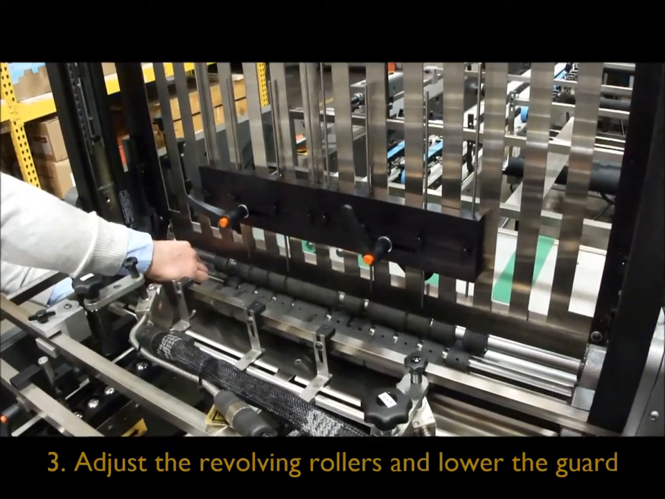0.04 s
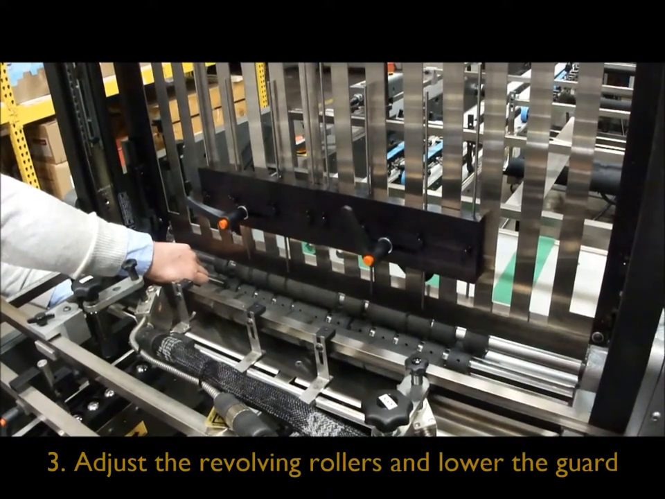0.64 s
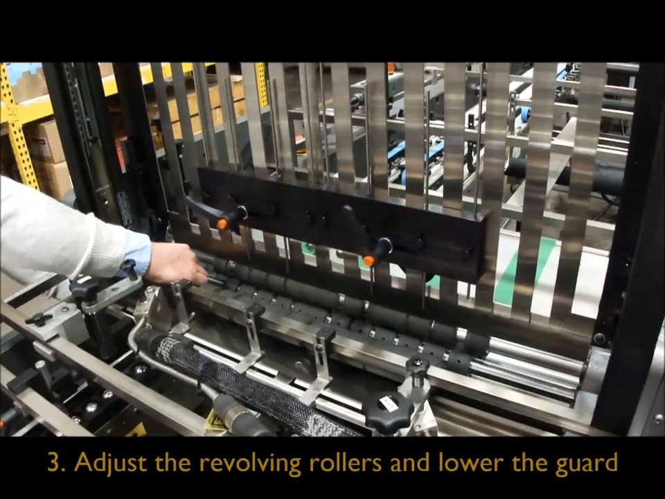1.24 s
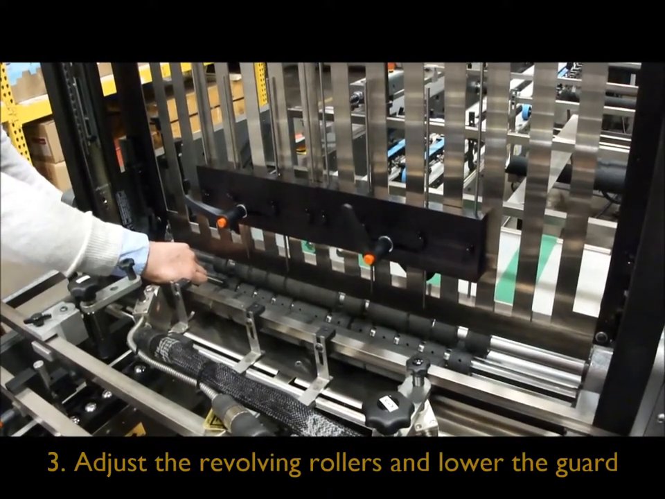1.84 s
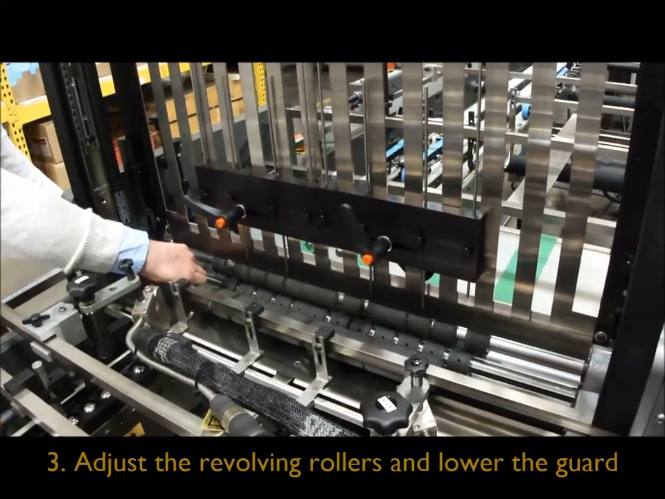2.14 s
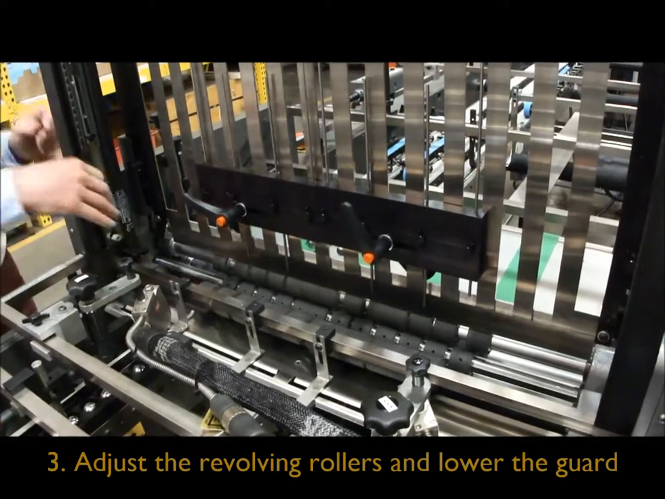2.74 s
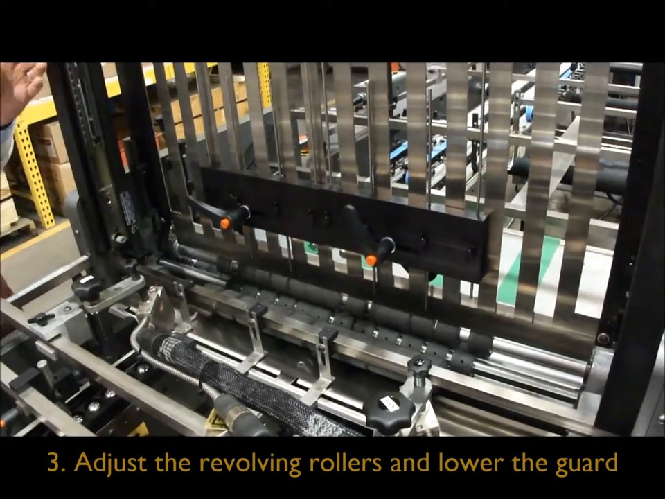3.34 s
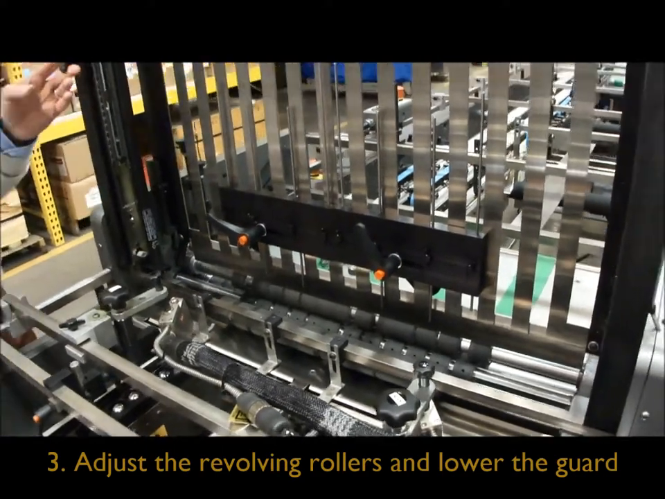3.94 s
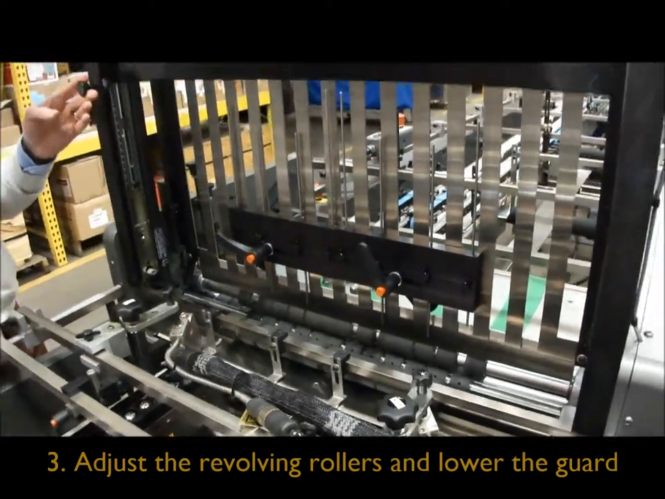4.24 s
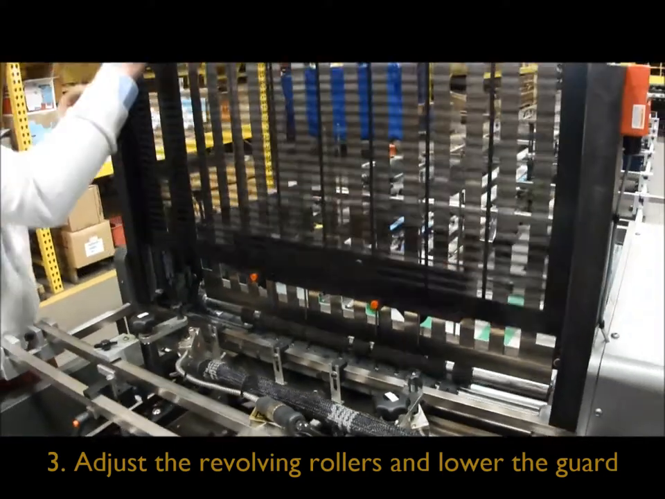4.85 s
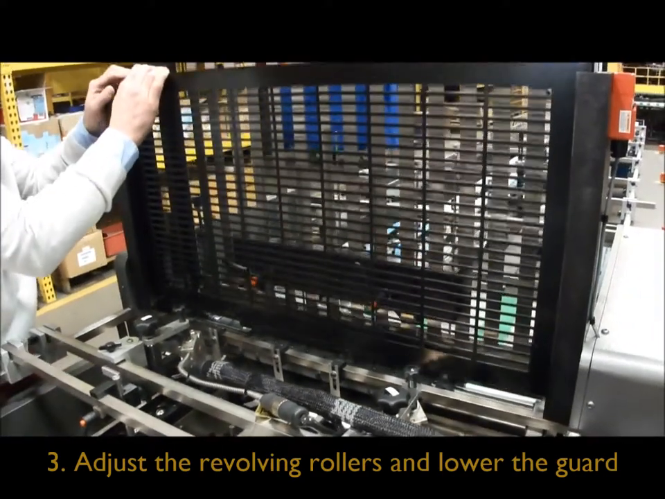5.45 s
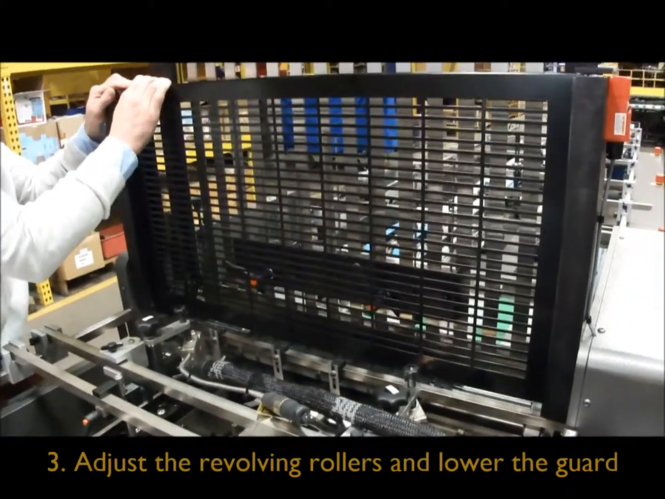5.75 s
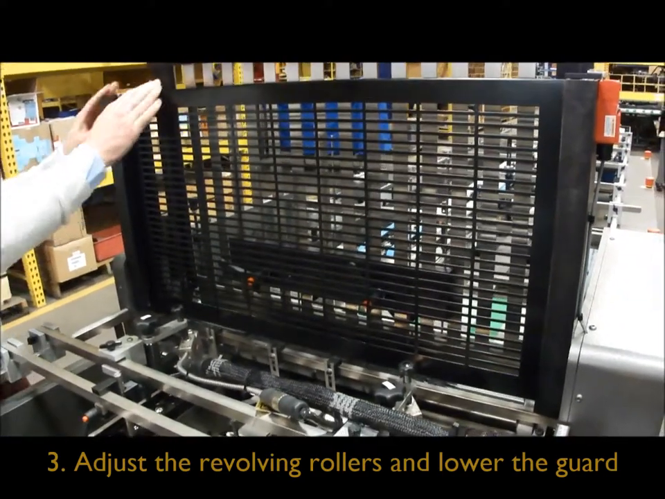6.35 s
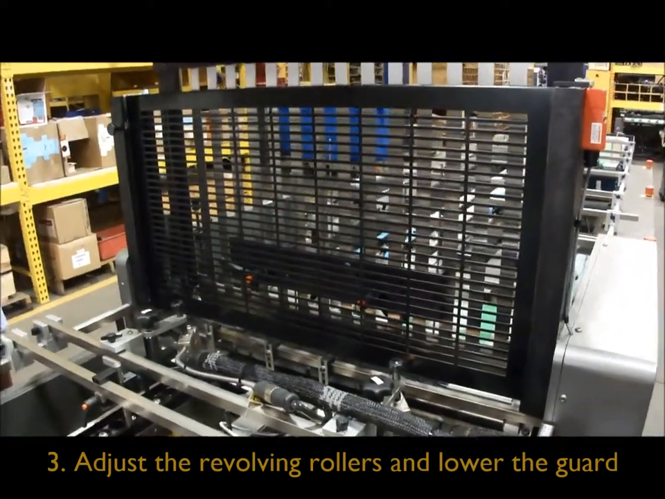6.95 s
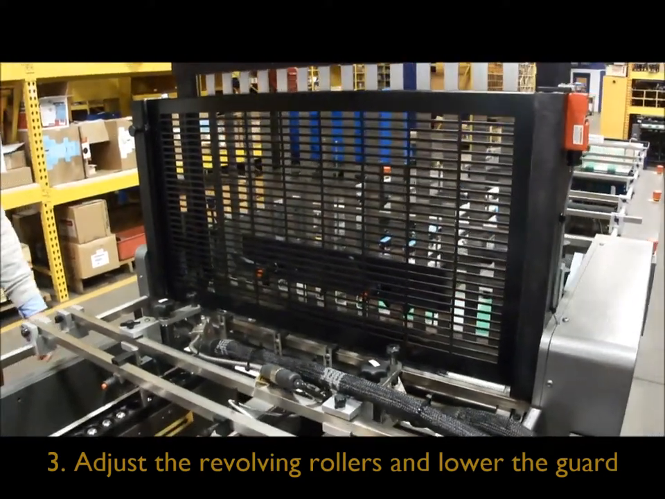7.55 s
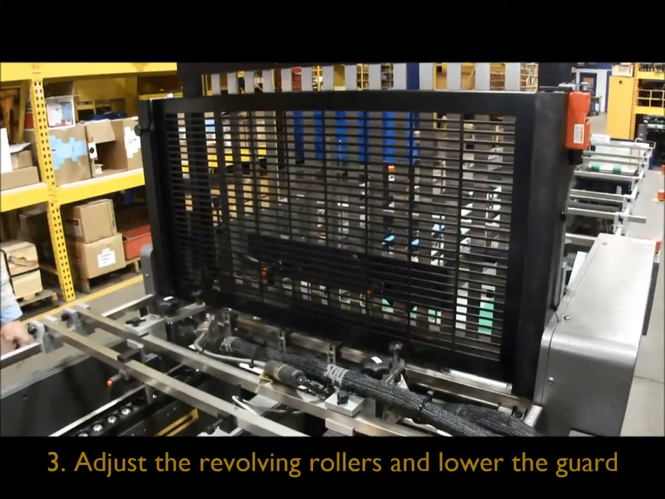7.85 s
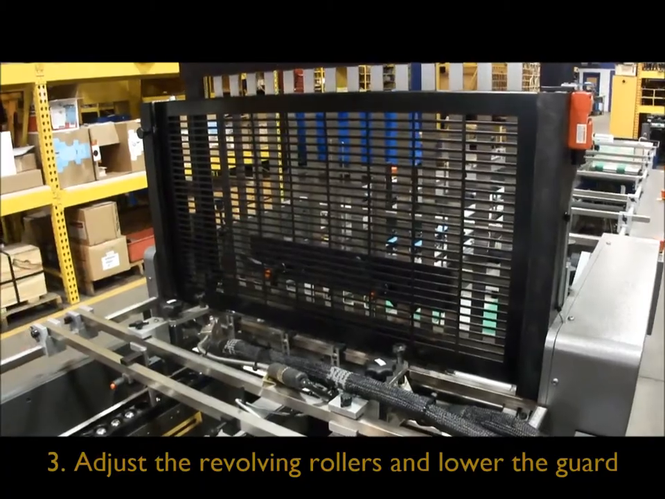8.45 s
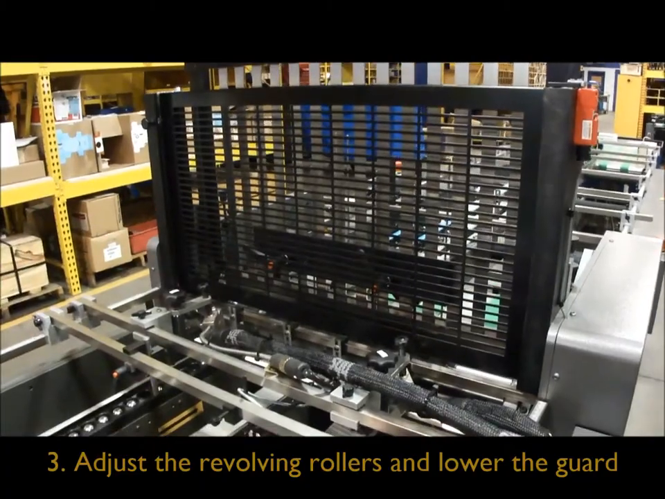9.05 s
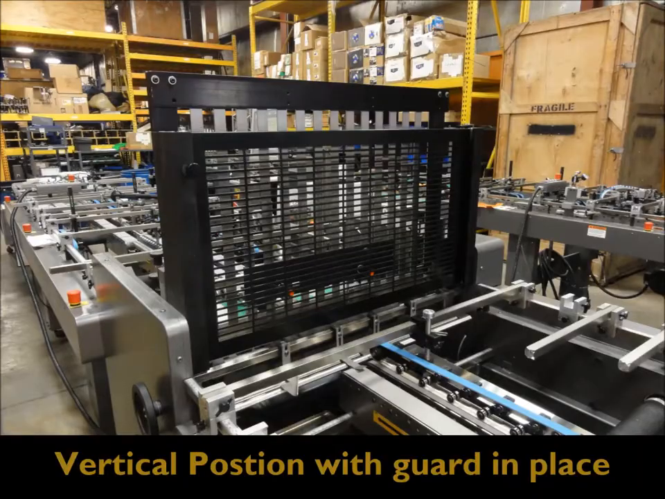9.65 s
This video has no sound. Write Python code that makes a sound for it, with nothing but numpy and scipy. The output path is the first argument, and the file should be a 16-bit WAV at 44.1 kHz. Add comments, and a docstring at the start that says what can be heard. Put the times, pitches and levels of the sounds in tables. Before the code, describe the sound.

Steady fan noise and motor hum from a nearby factory machine run throughout. At first a roller adds a whir and a thin, high whistle, then dies away. Sharp latch clicks follow, and a metal guard slides down with a squeaky scrape, thuds on its stop and clacks into place, ringing briefly in the hall. The machine drones on, with a few light taps close on the right just before an abrupt end.

```python
"""A feed roller whirrs and whistles against its belt, over the fan rush and motor tones of a folder gluer
idling in a factory hall. The roller is set by hand and eased off after about three seconds. A latch
clicks; a steel guard rasps down its rails, knocks on its stop and is snapped home. A few dry taps follow.
Gain control ducks the machine at the loud clicks and lets it swell back. The sound cuts off dead."""
import sys
import numpy as np
from scipy import signal
from scipy.fft import rfft, irfft, next_fast_len
from scipy.io import wavfile
from scipy.ndimage import uniform_filter1d, minimum_filter1d

SR = 44100
rng = np.random.default_rng(int(sys.argv[2]) if len(sys.argv) > 2 else 0)


def to_wav(sig):
    """Store sig (one row per channel, or 1-D mono) as 16-bit WAV at the path in sys.argv[1].

    Samples outside -1..1 are clipped; the rate is SR.
    """
    pcm = np.clip(np.atleast_2d(sig), -1, 1) * 32767
    pcm = np.round(pcm).astype(np.int16)
    wavfile.write(sys.argv[1], SR, pcm.T)  # frames by channels


N = 427329
T = np.arange(N) / SR
FREQ = np.maximum(np.fft.rfftfreq(N, 1 / SR), 1)

# Resonances of the roller and its bracket. Each row: pitch in Hz, width in Hz, relative level in dB.
ROLLER_RESONANCES = [(669, 33, -4), (938, 28, -6.5), (1092, 14, 3), (1089, 18, 3), (1161, 130, 0),
                     (1320, 140, -7.5), (1742, 90, -1), (2230, 550, -15.5)]
# Hits on latch and guard. Each row: start in seconds, peak loudness in dB, clack pitch in Hz,
# clack t60 in seconds, the guard's share in dB, the after-ring's share in dB.
GUARD_HITS = [(3.5627, 3, 8320, 0.02, -30, -24), (3.7388, -13, 6200, 0.083, 1.5, -6),
              (3.769, -14, 7760, .045, -9, -30), (3.791, -16.5, 8500, 0.037, -2, -21),
              (4.676, -17.5, 4600, 0.047, 4, -8), (4.7788, -1.5, 5700, 0.025, 1.5, -20),
              (5.4802, -11.5, 8200, 0.014, -28, -12), (5.516, -7, 7600, 0.022, -16.5, -12.5),
              (5.532, -3.5, 8600, 0.051, -6.5, -17), (5.748, -1, 7100, 0.02, -15.5, -14.5),
              (5.857, -5.5, 7200, 0.051, -21, -13), (5.865, 11.5, 7200, .013, -22, -20),
              (5.8942, -3.5, 6380, 0.097, -5.5, 0)]
# Tone of steel on steel. Each row: frequency in Hz, relative level in dB.
CLACK_COLOUR = [(60, -50), (400, -21.5), (1200, -0.5), (2400, -8.5), (4200, -12.5), (5800, -8), (7400, -1),
                (9500, -2), (11000, -6.5), (13000, -12.5), (16000, -26.5)]
# Ring of the small latch parts. Each row: pitch in Hz, relative level in dB, t60 in seconds.
LATCH_MODES = [(6020, 0, 0.43), (6230, 0.5, .25), (7000, -6, .4), (7540, -3, .3), (6910, 1, 0.3),
               (7930, -10.5, .2), (9000, -10, .4), (9000, -8.5, 0.28), (10000, -11, .3)]
# Ring of the guard frame. Each row: pitch in Hz, relative level in dB, t60 in seconds.
FRAME_MODES = [(605, -8.5, 0.61), (1200, -11, 0.29), (1347, -9.5, 0.35), (1530, -2.5, 0.33),
               (1494, -12.5, 1), (1677, -6, 0.64), (1920, -16, 0.78), (2133, -9, 0.17), (2180, -14.5, 0.68),
               (2280, -16.5, 0.76), (2570, -17, .13), (3321, -11, 0.42)]
# The guard landing and settling. Each row: start in seconds, level in dB, t60 in seconds.
LANDINGS = [(4.785, -9, .65), (4.872, -19, 0.35)]
# Dull boom of a landing. Each row: frequency in Hz, relative level in dB.
LANDING_COLOUR = [(90, -38), (180, 0), (260, 5), (380, 9), (650, -3.5), (1200, 3.5), (2150, 1),
                  (2700, -15.5), (5000, -36), (12000, -47.5)]
# Swell of the guard's slide. Each row: time in seconds, level in dB.
SLIDE_LEVEL = [(4.1, -49), (4.35, -41), (4.7, -29), (4.98, -30), (5.08, -41), (5.35, -59)]
# Rasp of the rails. Each row: frequency in Hz, relative level in dB.
RASP_COLOUR = [(4500, -12), (7500, -10), (8000, -0.5), (8900, 3.5), (10500, -1), (11500, 0), (16000, -12)]
# Small dry taps. Each row: start in seconds, knock level in dB, knock pitch in Hz, tick level in dB.
DRY_TAPS = [(8.3339, 9.5, 1430, 7.5), (8.3355, -1, 1700, -1), (8.692, 3, 1423, -20),
            (8.816, -9, 2000, -4.5), (8.828, -2, 2120, -33)]
# Soft high swishes. Each row: crest time in seconds, length in seconds, level in dB, pitch in Hz.
HIGH_SWISHES = [(3.397, .5, -61, 9000), (4.352, 0.37, -41, 5900), (7.697, 0.22, -38.5, 8350),
                (8.803, 0.35, -35.5, 7600)]
# Gear tones. Each row: pitch in Hz, relative level in dB.
GEAR_TONES = [(925, -4.5), (947.5, 1.5), (990.5, -1), (1087, -4.5)]
# Rise and fall of the gear tones. Each row: time in seconds, level in dB.
GEAR_SWELL = [(0, -39.5), (3.6, -41.5), (4.5, -29), (5.7, -29), (6.8, -40.5), (7.6, -31.5), (8.9, -35)]
# Steady tones of shafts and bearings. Each row: pitch in Hz, rms level in dB.
BEARING_TONES = [(352, -50), (404, -40.5), (412, -38.5), (764, -39), (1028, -49), (1071, -32.5),
                 (1141, -37), (1200, -39.5), (1296, -50.5), (1336, -39), (1362, -35.5), (1523, -46),
                 (1906, -42), (2180, -43.5), (2449, -49), (2724, -46.5)]
# Shaft and mains hum. Each row: pitch in Hz, rms level in dB.
HUM_TONES = [(55.5, -62), (111, -56), (120, -52), (141, -62), (177.6, -44), (229, -44.5), (266, -44),
             (451, -40), (479, -40), (667, -38)]
# Rush of fans and belts. Each row: frequency in Hz, relative level in dB.
RUSH_COLOUR = [(25, -43.5), (75, -26), (115, -11), (200, -7), (390, -0.5), (650, 1), (1050, 1), (1500, 0),
               (2300, -7), (5600, -24.5), (8000, -24), (10000, -27), (11500, -41.5), (16000, -36.5)]
# Tone control with deep cuts in the harsh treble. Each row: frequency in Hz, gain in dB.
EQ_CURVE = [(2450, -0.5), (2750, -11), (3000, -28.5), (3220, -16), (3550, -12.5), (3820, -16.5),
            (4000, -33.5), (4220, -13.5), (4550, -10), (4820, -14), (5000, -22.5), (5200, -10), (5550, 1.5),
            (10800, -7.5), (12300, -42), (13700, -28.5), (15200, -4.5)]


def roller(ease_off_s=2.41, turn_hz=19.7, flutter_db=-0.2, whistle_hz=7310, sag_hz_per_s2=50):
    """Friction rings the roller; its nip hisses, with one steady whistle and one that sinks as it is set."""
    eased = np.maximum(T - ease_off_s, 0) ** 2  # off the belt, each layer fades ever faster
    body = noise(sum(undb(db) * resonance(hz, width) for hz, width, db in ROLLER_RESONANCES))
    # the belt grips unevenly, a little harder once on each turn
    grip = undb(1.316 * walk(15) + flutter_db * np.sin(2 * np.pi * turn_hz * T))
    steady = noise(resonance(5612, 60) + undb(-8.5) * resonance(5610, 380))
    # a narrow band of noise, shifted up to ride the falling pitch
    sinking_hz = whistle_hz - sag_hz_per_s2 * T ** 2
    band = signal.hilbert(noise(resonance(1500, 240)))
    sinking = np.real(band * np.exp(2j * np.pi * np.cumsum(sinking_hz - 1500) / SR))
    whirr = body * grip * undb(-19 - 9.5 * eased)
    whistles = (undb(-5.5) * steady * grip + undb(-6.5) * sinking) * undb(-31.5 - 27 * eased)
    hiss = noise(resonance(7300, 3000) + undb(-3.5) * resonance(8250, 450)) * undb(-38 - 18.5 * eased)
    return (whirr + whistles + hiss) * pan(.6)


def guard_hits(hall_t60=0.38, knock_t60=0.083, frame_db=4.5, left_db=2.0):
    """Each hit gives a short clack and knocks the guard's panel; latch, frame and hall ring after it."""
    out = np.zeros((2, N))
    steel, panel = colour(CLACK_COLOUR), resonance(2350, 1000)
    no_bass = signal.butter(2, 350, "high", fs=SR, output="sos")
    for s, peak_db, hz, t60, guard_db, after_db in GUARD_HITS:
        # the part that is hit favours its own pitch
        clack = noise(steel * (1 + undb(2) * resonance(hz, 1100)), count=SR, top_side_db=-11) * fade(t60)
        hall = noise(steel, count=SR, top_side_db=-6) * fade(hall_t60) * attack(0.0021)
        tail = undb(-0.5) * hall + undb(-14) * ring(LATCH_MODES, detune=0.0096, side_db=-6)
        knock = noise(panel, count=SR) * fade(knock_t60)
        frame = undb(frame_db) * ring(FRAME_MODES, detune=0.0024, side_db=-17.5) * attack(0.005)
        latch = (clack + undb(after_db) * tail) * pan(left_db)
        guard = undb(guard_db) * (knock + undb(after_db) * frame)
        hit = signal.sosfilt(no_bass, latch + guard)  # the hits carry no bass
        add(out, s, undb(peak_db) * hit / loudness(hit).max())
    return out


def guard_landing():
    """The guard's weight drops on its stop with a dull boom, then settles."""
    out = np.zeros((2, N))
    for s, db, t60 in LANDINGS:
        add(out, s, undb(db) * noise(colour(LANDING_COLOUR), count=SR) * fade(t60) * attack(0.005))
    return out


def guard_slide(squeak_count=190, squeak_db=1, squeak_s=0.06, start_s=4.35, spread_s=0.77):
    """The sliding guard rasps in its rails and gives off a crowd of tiny squeaks."""
    squeaks = np.zeros((2, N))
    t = T[:int(squeak_s * SR)]
    swell = np.hanning(len(t))
    for when, pitch, size, side in rng.random((squeak_count, 4)):
        hz = 7900 + 3000 * pitch ** 2
        chirp = swell * np.sin(2 * np.pi * hz * t + 2 * swell)
        add(squeaks, start_s + spread_s * when, size ** 4 * chirp * pan(8 * (side - .5)))
    rasp = noise(colour(RASP_COLOUR)) * undb(3.7 * walk(45))
    return (rasp + undb(squeak_db) * squeaks) * undb(curve(SLIDE_LEVEL)) * pan(1.8)


def taps(knock_t60=0.0036, tick_t60=0.00097, tick_hz=6500):
    """Light contacts close by on the right: a heavily damped knock with a tick on top."""
    out, t = np.zeros((2, N)), T[:SR]
    for s, db, hz, tick_db in DRY_TAPS:
        knock = np.sin(2 * np.pi * hz * t) * fade(knock_t60)
        tick = np.sin(2 * np.pi * tick_hz * t) * fade(tick_t60)
        add(out, s, (undb(db) * knock + undb(tick_db) * tick) * pan(-7.5))
    no_bass = signal.butter(2, 500, "high", fs=SR, output="sos")  # small parts radiate no bass
    return signal.sosfilt(no_bass, out)


def swishes(width_hz=2800):
    """Brief, flickering swells of soft treble noise."""
    out = np.zeros((2, N))
    for s, length, db, hz in HIGH_SWISHES:
        swell = np.exp(-(2 * (T[:SR] - .5) / length) ** 2)
        add(out, s - .5, undb(db) * swell * noise(resonance(hz, width_hz), count=SR))
    return out * undb(1.49 * walk(25))


def drive(whine_hz=804, whine_db=-30, twin_db=-12.5, beat_s=.683, in_step_s=1.97):
    """A motor and its weaker twin whine at nearly one pitch and beat slowly; the gears swell and sink."""
    gears_db = curve(GEAR_SWELL)
    beat = np.abs(1 + undb(twin_db) * np.exp(2j * np.pi * (T - in_step_s) / beat_s))
    push = undb(.3 * (gears_db - gears_db.mean()))  # the motors whine harder when the gears sing
    whine = tones([(whine_hz, whine_db)], waver_db=2, drift_rad=.7) * beat * push
    gears = tones(GEAR_TONES, waver_db=-0.5, drift_rad=0.57) * undb(gears_db)
    return whine + gears


def shafts():
    """Spinning shafts and bearings sing over a low shaft and mains hum."""
    bearings = tones(BEARING_TONES, waver_db=4, drift_rad=.9)
    return bearings + tones(HUM_TONES, waver_db=1.5, drift_rad=0.76)


def belt_groan(hz=640, level_db=-23.5, first_s=.54, lap_s=2.56):
    """A belt groans briefly once on each lap."""
    from_crest_s = (T - first_s + lap_s / 2) % lap_s - lap_s / 2
    swell = np.exp(-(from_crest_s / 0.054) ** 2)
    return undb(level_db) * swell * noise(resonance(hz, 22))


def fan_rush(level_db=-20):
    """Fans and belts lay a broad, steady bed of noise."""
    return noise(colour(RUSH_COLOUR)) * undb(level_db + .5 * walk(20))


def tones(table, waver_db, drift_rad):
    """Steady tones whose reflections in the hall shift in strength and phase."""
    out = np.zeros(N)
    for hz, db in table:
        amplitude = np.sqrt(2) * undb(db + waver_db * walk(3))
        out += amplitude * np.sin(2 * np.pi * hz * T + drift_rad * walk(5))
    return out


def ring(modes, detune, side_db):
    """Struck modes; each hit detunes them a little and radiates them differently to left and right."""
    hz, db, t60 = np.transpose(modes)
    shift, polarity, side = rng.standard_normal((len(modes), 3)).T
    phase = np.outer(2 * np.pi * hz * (1 + detune * shift), T[:SR])
    gains = undb(db) * (np.sign(polarity) + undb(side_db) * side * np.array([[1], [-1]]))
    return gains @ (np.sin(phase) * fade(t60[:, None]))


def noise(gain, count=N, top_side_db=-8):
    """Coloured stereo noise at rms 1, narrow in the bass and wider in the treble."""
    size = next_fast_len(count, real=True)
    freq = np.maximum(np.fft.rfftfreq(size, 1 / SR), 1)
    mid, side = rfft(rng.standard_normal((2, size))) * np.interp(freq, FREQ, gain)
    side = side * colour([(150, -20), (1000, -13.5), (7000, top_side_db)], freq)
    stereo = irfft(np.array([mid + side, mid - side]), size)[:, :count]
    return stereo / np.sqrt(np.mean(stereo ** 2))


def undb(db):
    """Decibels to gain."""
    return 10 ** (np.asarray(db) / 20)


def curve(points):
    """A fader move through (seconds, dB) points, in dB."""
    return np.interp(T, *np.transpose(points))


def colour(points, freq=FREQ):
    """Gain at each frequency from (Hz, dB) points."""
    hz, db = np.transpose(points)
    return undb(np.interp(np.log(freq), np.log(hz), db))


def resonance(hz, width_hz):
    """Gain of a steep-sided resonance."""
    return 1 / (1 + ((FREQ ** 2 - hz ** 2) / (FREQ * width_hz * 1.4)) ** 2)


def walk(rate_hz):
    """Random wander with spread near 1."""
    knots = rng.standard_normal(512)
    return np.interp(T * rate_hz, np.arange(len(knots)), knots)


def attack(rise_s):
    """A softened onset, one second long."""
    return 1 - np.exp(-T[:SR] / rise_s)


def fade(t60):
    """One second of decay, falling 60 dB every t60 seconds."""
    return np.exp(-np.log(1000) * T[:SR] / t60)


def pan(left_db):
    """Left and right gains."""
    return undb(np.array([[left_db], [-left_db]]) / 2)


def add(out, s, sound):
    """Mix a sound in at s seconds."""
    i = int(s * SR)
    out[:, i:i + sound.shape[1]] += sound[:, :N - i]


def loudness(x, size=88):
    """Running rms of both channels over two milliseconds."""
    power = uniform_filter1d(np.mean(x ** 2, axis=0), size, mode="constant")
    return np.sqrt(np.maximum(power, 1e-12))


def gain_control(x, ceiling_db=-8.5, range_db=9.5, start_duck_db=3.5,
                 ahead_s=0.0088, hold_s=0.63, recover_db_per_s=2.5):
    """The whole mix ducks just ahead of a peak over the ceiling, holds, then swells back slowly."""
    over_db = np.clip(20 * np.log10(loudness(x)) - ceiling_db, 0, range_db)
    peak_db = -minimum_filter1d(-over_db, int(hold_s * SR))
    held_db = np.interp(T + ahead_s - hold_s / 2, T, peak_db)
    recovered_db = recover_db_per_s * T
    duck_db = np.maximum.accumulate(np.maximum(held_db + recovered_db, start_duck_db)) - recovered_db
    return x * undb(-uniform_filter1d(duck_db, 300))


def scene():
    """The roller and the work on the guard, over the idling machine."""
    machine = (fan_rush() + shafts() + belt_groan() + drive()) * pan(.4)
    return machine + roller() + guard_slide() + swishes() + guard_hits() + guard_landing() + taps()


def record(dry, eq_taps=2048, cut_s=8.917, top_hz=16000):
    """Equaliser, gain control, full-scale clipping, a dead cut and a steep low-pass."""
    freq = np.maximum(np.fft.rfftfreq(eq_taps, 1 / SR), 1)
    # minimum phase, so the equaliser never rings ahead of a click
    cepstrum = irfft(np.log(colour(EQ_CURVE, freq)))
    cepstrum[1:eq_taps // 2] *= 2
    cepstrum[eq_taps // 2 + 1:] = 0
    impulse = irfft(np.exp(rfft(cepstrum)))
    shaped = signal.fftconvolve(dry, impulse[None], axes=1)[:, :N]
    cut = np.clip(gain_control(shaped), -1, 1) * (T < cut_s)
    return signal.sosfilt(signal.ellip(10, .2, 80, top_hz, fs=SR, output="sos"), cut)


dry = scene()
out = record(dry)
to_wav(out)
```